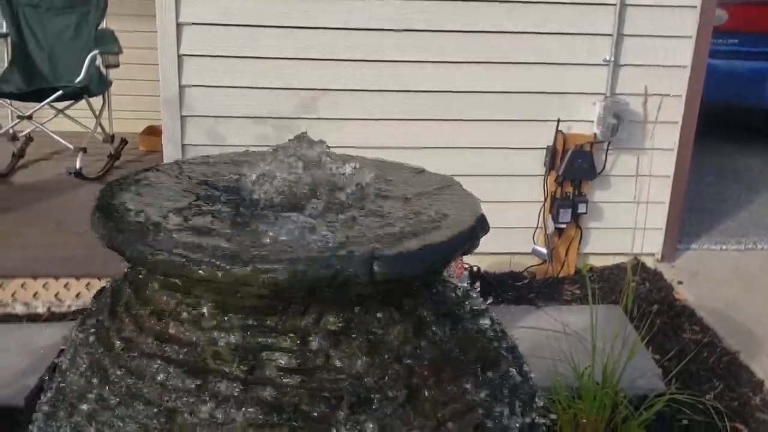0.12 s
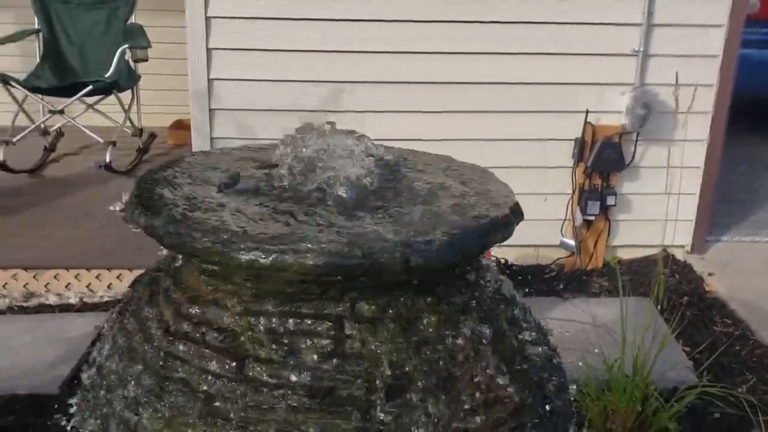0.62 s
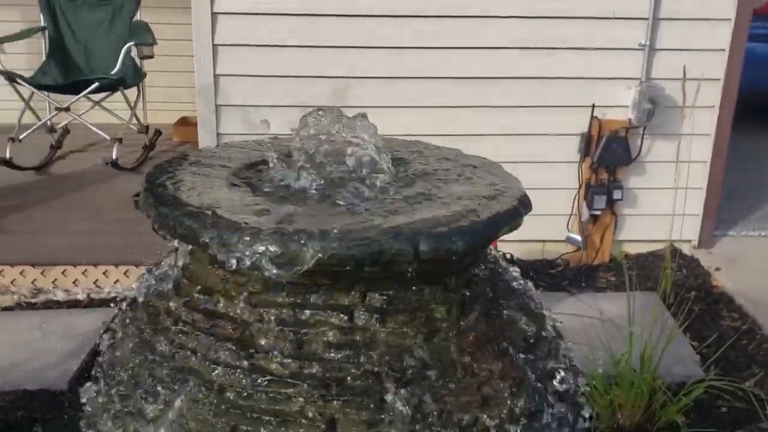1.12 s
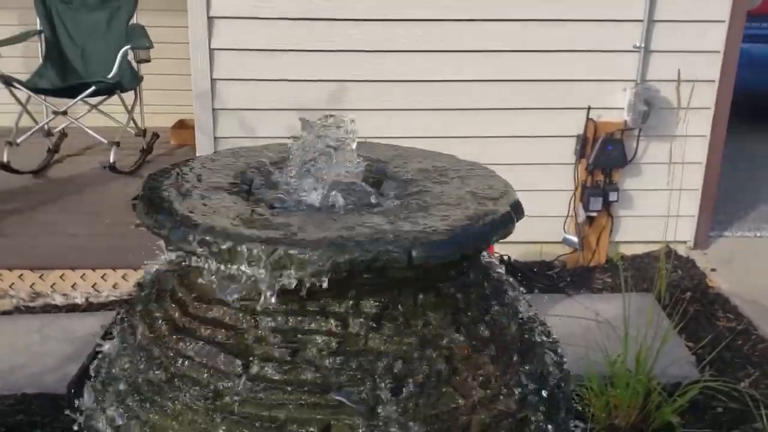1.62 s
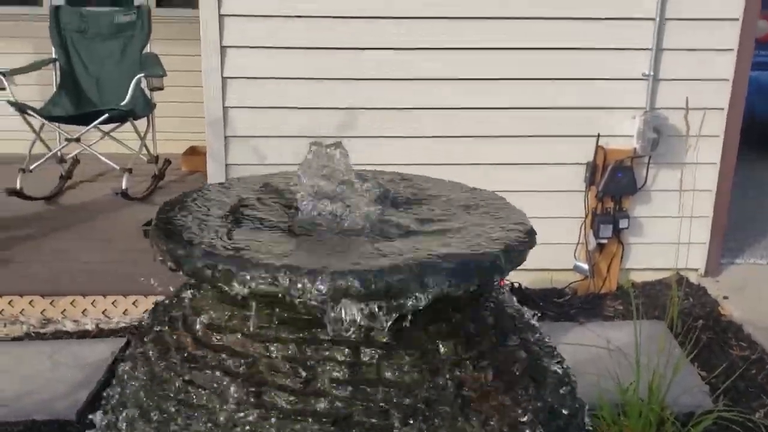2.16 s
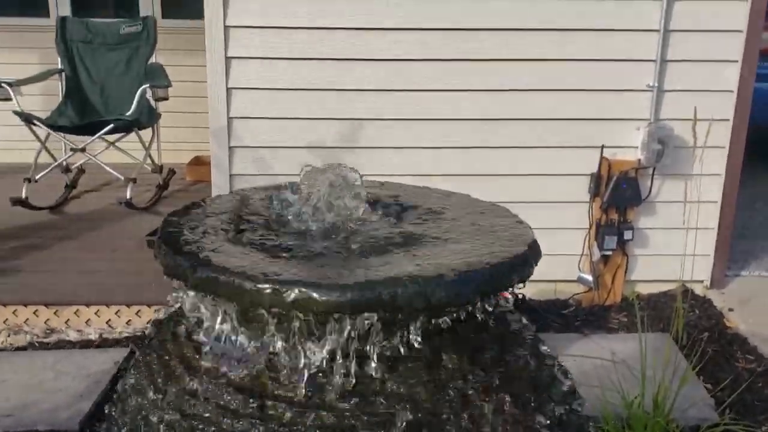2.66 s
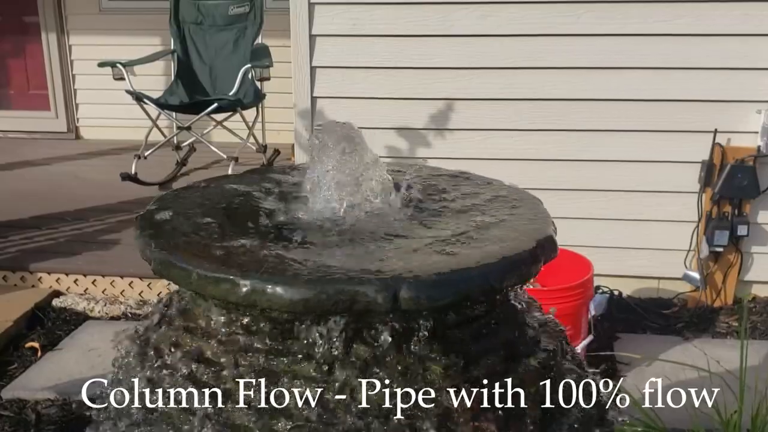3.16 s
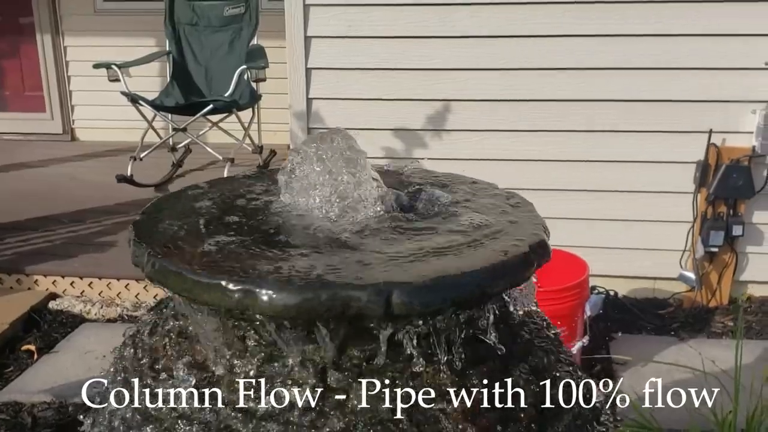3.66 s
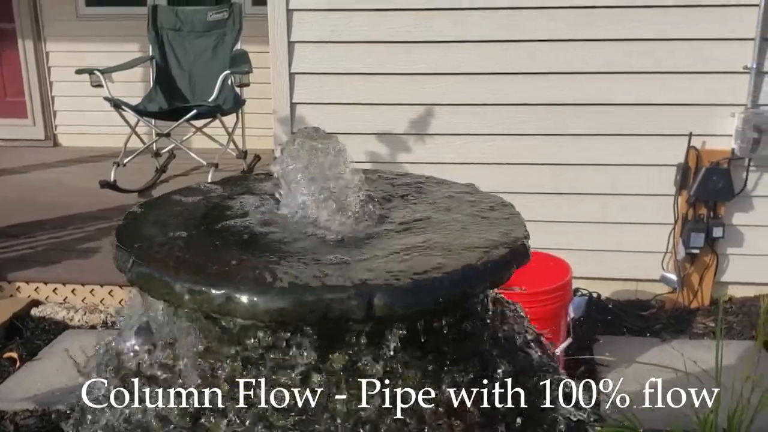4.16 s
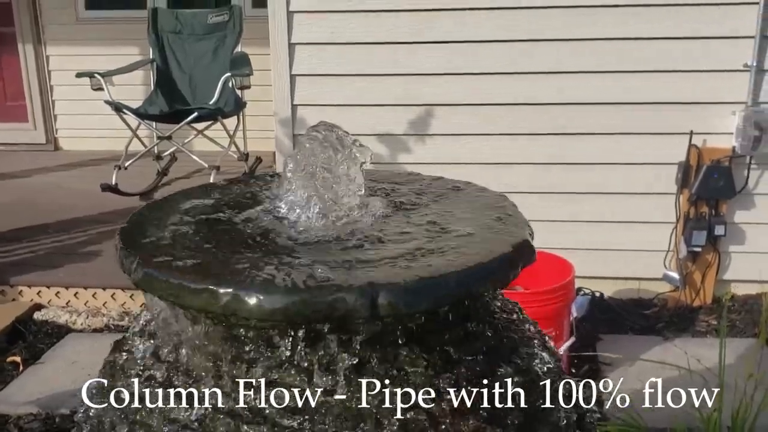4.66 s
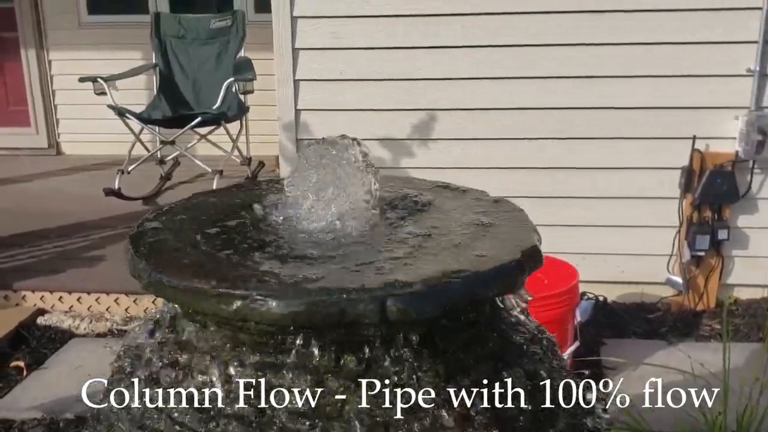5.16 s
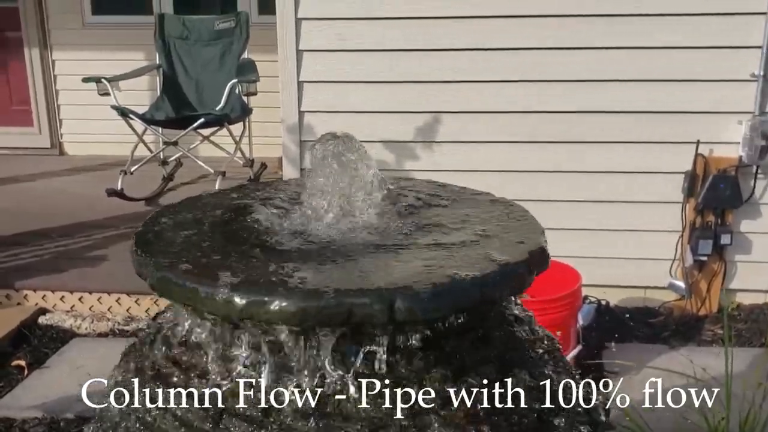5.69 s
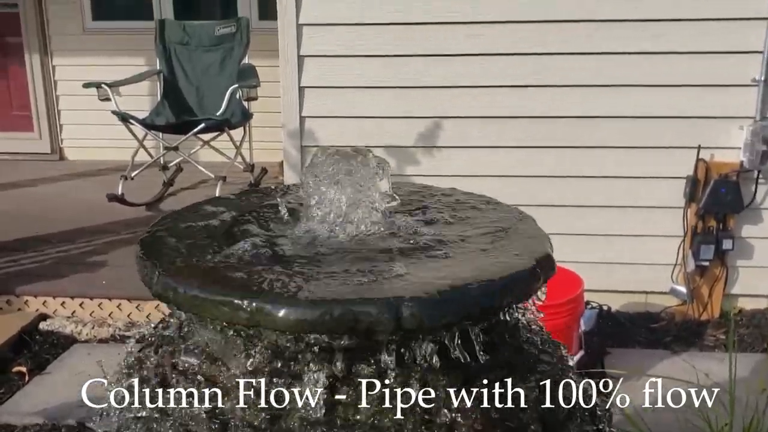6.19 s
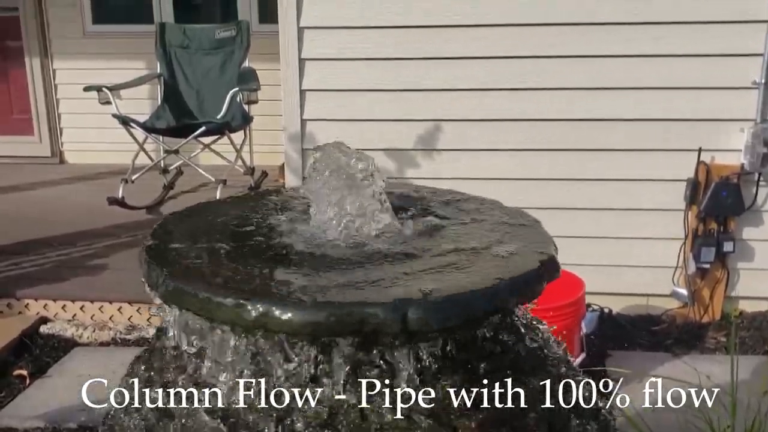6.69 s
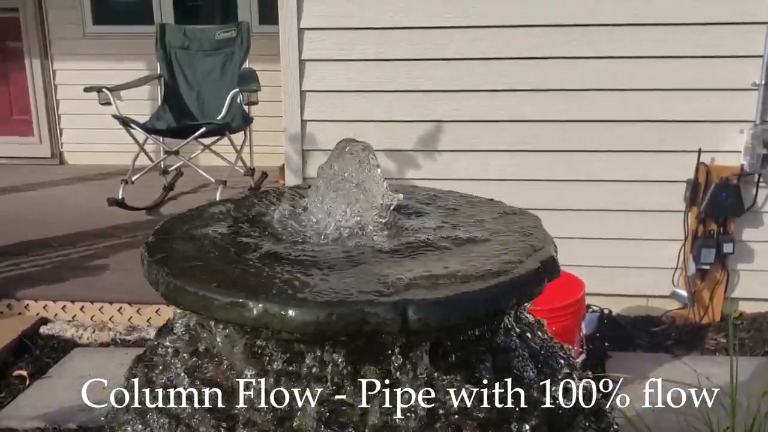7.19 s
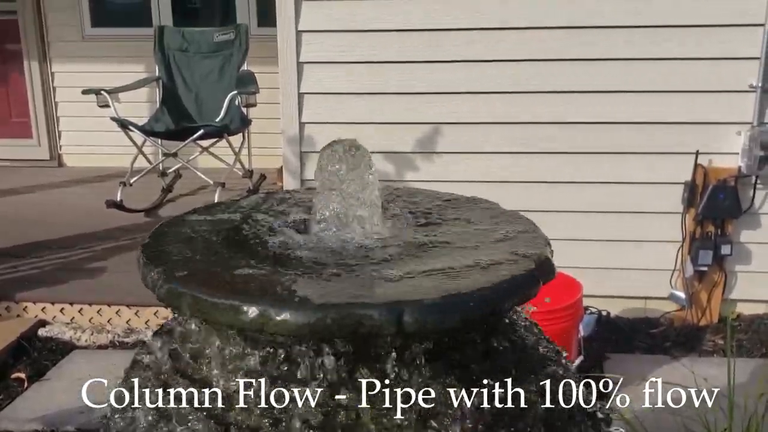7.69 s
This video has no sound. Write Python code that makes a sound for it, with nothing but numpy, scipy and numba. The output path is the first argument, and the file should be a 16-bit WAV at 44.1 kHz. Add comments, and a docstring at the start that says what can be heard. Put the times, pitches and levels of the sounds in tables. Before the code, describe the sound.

A stone urn fountain outdoors, close to a stereo microphone. From 0 seconds water is already running: a bright, dense splash with fine hissing spray, small clear bubbles plinking, rounder gurgles at the pipe mouth and drops slapping wet stone. A faint pump hum, low rumble and occasional dull knocks lie beneath. Water spills over the rim in brief surges about every half second, noticeably near 0.4, 0.8, 1.3, 1.8 and 2.7. At 2.77 everything stops abruptly, leaving about a tenth of a second of silence. At 2.87 the water returns from another angle, its tone changed at each ear, quieter and more even, with gentler surges and fewer prominent plinks. Around 4.6 to 5 seconds it swells; gurgles, plinks and splashes become livelier, and the flow stays fuller until it ends around 7.8 seconds, without fading.

```python
"""An urn fountain close by, outdoors: a low rumble and a pump hum lie under water that gurgles and splashes down.
From the start, noise makes the splash and fine spray, short noise bursts the drops, gliding tones the bubbles.
At 2.77 s the sound cuts out for about a tenth of a second.
It comes back from another angle, with a new tone colour at each ear, quieter at first;
near 5 s it swells and stays fuller until the end."""
import sys
import numpy as np
from scipy import signal
from scipy.fft import rfft, irfft
from scipy.io import wavfile
from scipy.ndimage import uniform_filter1d
from numba import njit

SR = 44100
rng = np.random.default_rng(int(sys.argv[2]) if len(sys.argv) > 2 else 0)


def persist_wave(psi):
    """Save psi, clipped to +-1, as 16-bit WAV."""
    counts = np.round(np.clip(psi, -1, 1) * 32767).astype(np.int16)
    wavfile.write(sys.argv[1], SR, np.atleast_2d(counts).T)


def field_ratio(decibels):
    """Amplitude ratio for a level in dB (20 dB per decade); scalars and array-likes work."""
    return 10 ** (np.asarray(decibels, dtype=float) / 20)


N = 344862
T = np.arange(N) / SR  # time of every sample [s]

# the two stretches of sound, with silence between: (start [s], end [s])
STRETCHES = [(0, 2.7745), (2.8685, 7.82)]
# low and high tones of the rumble: (frequency [Hz], relative level [dB])
RUMBLE_COLOUR = [(20, -34), (35, -13), (45, 5.5), (63, 3.5), (90, 3.5), (130, -8), (157, 2.5), (190, -23.5),
                 (232, -9.5), (300, -26.5)]
# pump tones: (frequency [Hz], relative level [dB], size of the waver [dB])
HUM_TONES = [(103.9, 3, .5), (120.6, -8, 4), (98, -14, 1)]
# base levels for the whole of each stretch, to which the swell is added, one row per stretch:
# (splash [dB], fine spray [dB], hum [dB], rumble [dB])
BASE_LEVELS = [(-39, -35.5, -50, -56.5), (-38, -31.5, -57, -59.5)]
# shared sag and swell of the steady layers and random events, one list per stretch: (time [s], level change [dB])
SWELL = [
    [(0, -1), (.6, 1.3), (1.8, 0.5), (2.3, 0), (2.77, -2)],
    [(2.87, -5), (3.6, -4.5), (4.1, -5.5), (4.6, -5), (5.0, -1), (5.6, .5), (6.5, 1), (6.85, 0.5),
     (7.82, 0.55)],
]
# waves spilling over the rim: (time of the splash peak [s], splash change [dB], spray change [dB])
WAVES = [(.36, 3.5, 5), (.83, 3, 4.5), (1.29, 3.5, 4.5), (1.48, 1, 2), (1.79, 3, 5.5), (2.21, 1, 1.5),
         (2.71, 3, 1.5), (3.24, -1.5, 3), (4.21, 1.5, 1), (4.76, 1.5, 1), (4.97, 1, 2), (5.53, 1.5, 0.5),
         (5.72, 1.5, 1.5), (6.47, 0, -0.5), (7.28, 0.5, 0.5)]
# splash colour at each ear:
# (frequency [Hz], left, right in the first stretch [dB], left, right in the second stretch [dB])
SPLASH_COLOUR = [(204, -16.5, -15.5, -15.5, -17.5), (238, -17, -15.5, -17.5, -17.5),
                 (278, -18, -22.5, -21, -22.5), (456, -17, -15.0, -10, -9.5), (520, -11, -15, -8, -10.5),
                 (580, -14, -11.5, -15, -14.5), (1000, -9.5, -10, -12, -12), (1425, -11.5, -5, -11.5, -9),
                 (2170, -8.5, -2.1, -3.5, -5), (3640, -10, -0.1, -4.5, -1.4), (4330, -8.5, -8, -7, -6.5),
                 (6500, -8.5, -11.5, -8, -13.5), (9300, -2.5, -22.5, -4.5, -17.5)]
# fine spray colour at each ear:
# (frequency [Hz], left, right in the first stretch [dB], left, right in the second stretch [dB])
SPRAY_COLOUR = [(6200, -10.0, -14.0, -9.1, -14.4), (8800, -10.9, -16.1, -8.4, -23.1),
                (10500, -8.6, -11.6, -7.4, -17.9), (12200, -5.9, -6.1, -2.4, -11.4),
                (13800, -5.7, -10.7, -1.3, -9.4), (14800, -4.0, -13.7, 0.3, -8.0),
                (15600, -2.6, -13.7, 1.4, -8.5)]
# dull knocks in the urn: (time [s], level [dB], pitch [Hz])
KNOCKS = [(1.139, -48, 156), (1.318, -37.5, 160), (1.421, -45, 226), (1.97, -49, 158), (1.985, -44, 246),
          (2.515, -50, 150), (5.793, -51, 164), (7.279, -49, 160)]
# big bubbles at the pipe mouth: (time [s], level [dB], pitch [Hz])
GURGLES = [(0.095, -44.5, 514), (0.632, -44, 546), (1.429, -42, 504), (1.514, -41, 470), (1.654, -41, 610),
           (2.13, -41, 510), (2.311, -43.5, 454), (2.381, -39, 494), (2.538, -36, 635), (2.572, -39, 537),
           (2.679, -43, 685), (3.53, -44, 536), (3.914, -45.5, 513), (4.61, -47, 543), (4.93, -46, 524),
           (5.044, -47, 480), (5.185, -43.5, 460), (5.242, -42, 546), (5.294, -38.5, 518),
           (5.686, -44, 490), (5.952, -44, 510), (6.088, -43.5, 421), (6.835, -46, 540), (6.96, -41.5, 523),
           (7.017, -41, 520), (7.161, -45, 496), (7.187, -43, 520), (7.322, -42, 524), (7.625, -47, 530),
           (7.648, -38, 510), (7.696, -37, 523), (7.758, -41, 492)]
# small clear ringing bubbles: (time [s], level [dB], pitch [Hz])
PLINKS = [(0.0662, -28, 1700), (0.2947, -25, 2620), (0.3132, -17.5, 3340), (0.335, -30.5, 854),
          (0.375, -29, 1960), (0.377, -27.5, 1420), (0.4534, -18, 3460), (0.5082, -23, 2400),
          (0.6355, -26, 2490), (0.774, -33, 1350), (0.7941, -22, 3580), (0.9981, -30, 3460),
          (1.0635, -25.5, 3660), (1.0984, -23.5, 2280), (1.19, -37, 850), (1.2176, -22, 3630),
          (1.2665, -23, 1670), (1.4022, -23, 3550), (1.426, -34, 1260), (1.4696, -18.5, 3340),
          (1.5678, -30, 3720), (1.6182, -19.5, 3290), (1.727, -25, 2300), (1.7774, -22, 3630),
          (1.8188, -22, 3370), (1.9879, -23, 3500), (2.076, -32, 1100), (2.231, -30.5, 950),
          (2.566, -31, 1620), (2.6544, -27, 3660), (2.9472, -33, 2340), (3.3747, -28, 2090),
          (3.6466, -33.5, 1750), (3.8407, -33, 3070), (4.2, -40, 1110), (4.385, -34, 1900),
          (4.6877, -30, 3260), (5.0305, -28, 3370), (5.0968, -29, 2550), (5.2899, -22.5, 3660),
          (5.313, -34.5, 1190), (5.3906, -28, 2460), (5.549, -35, 1290), (5.6146, -24, 3270),
          (5.6456, -20, 4430), (5.698, -37, 855), (5.7104, -21.5, 3220), (5.7304, -19.5, 3740),
          (5.9693, -24, 3100), (6.3026, -25, 2420), (6.336, -24, 3630), (6.34, -27.5, 1170),
          (6.4318, -23, 2900), (6.8833, -25, 2000), (6.9835, -25, 2830), (7.147, -34, 1340),
          (7.196, -28, 2280), (7.2255, -20.5, 3370), (7.4919, -27, 3250), (7.6755, -21, 3320),
          (7.687, -33, 1250), (7.7712, -27, 2800)]
# drops slapping wet stone, before colouring: (time [s], level [dB], level of the duller part [dB])
SLAPS = [(0.1351, -12, -25), (0.306, -20, -24), (0.4374, -15, -22), (0.4544, -5, -30), (0.7916, -18, -14),
         (0.8355, -15, -24), (0.8704, -8, -27), (0.921, -8, -29), (1.098, -5, -10), (1.2052, -22, -29),
         (1.6407, -7, -15), (2.156, -23, -18), (2.2675, -7, -28), (2.2787, -7, -27), (2.3531, -9, -31),
         (2.5125, -7, -32), (2.6567, -10, -22), (2.6605, -15, -27), (2.677, -16, -24), (2.7312, -9.5, -30),
         (2.736, -15, -28), (2.8687, -11, -23), (3.1383, -15, -21), (3.1926, -18, -35), (3.3877, -14, -34),
         (4.187, -18, -25), (4.9302, -23, -30), (4.997, -23, -24), (5.032, -6, -14), (5.1282, -19, -30),
         (5.5373, -21, -28), (5.647, -9, -12), (5.7924, -11, -25), (6.034, -10, -24), (6.0836, -19, -17),
         (6.12, -10, -19), (6.339, -17, -24), (6.4652, -18, -22), (6.6094, -18, -25), (6.6578, -17, -20),
         (6.983, -12, -25), (7.28, -12, -23), (7.3467, -21, -23), (7.3926, -16, -30), (7.5577, -16, -29)]


def rms_one(x):
    """Scale a sound so that the average of its channels has rms 1."""
    return x / np.sqrt(np.mean(np.mean(np.atleast_2d(x), axis=0) ** 2))


def butter(x, hz, kind, order=2):
    """Keep the lows or the highs with a Butterworth filter."""
    return signal.sosfilt(signal.butter(order, hz, kind, fs=SR, output="sos"), x)


def colour(x, hz, db, size=8192):
    """Shape the tone through (Hz, dB) points with a minimum-phase filter, which never sounds early."""
    f = np.linspace(1, SR / 2, size + 1)
    cepstrum = irfft(np.log(field_ratio(np.interp(np.log(f), np.log(hz), db))))
    # folding the cepstrum onto its first half gives the minimum phase
    cepstrum[1:size] *= 2
    cepstrum[size + 1:] = 0
    response = irfft(np.exp(rfft(cepstrum)))
    return signal.fftconvolve(x, response)[:len(x)]


def walk(steps_per_s):
    """Smooth random wander: random steps, averaged twice, with spread 1."""
    k = int(SR / steps_per_s)
    steps = np.repeat(rng.standard_normal(N // k + 1), k)
    smooth = uniform_filter1d(uniform_filter1d(steps, k), k)[:N]
    return smooth / smooth.std()


def in_stretch(pair, s=T):
    """Pick the first or second value, whichever stretch each moment belongs to."""
    return np.where(s < STRETCHES[1][0], *pair)


def swell_db():
    """Shared slow rise and fall in dB, joined through both stretches."""
    s, db = np.concatenate(SWELL).T
    return np.interp(T, s, db)


def waves(db, lead_s):
    """Level change in dB as each wave comes and goes as a bell curve, over a slow random wander."""
    spread_s = 0.049
    total = 0.67 * walk(6.0)
    for peak_s, change_db in zip(np.transpose(WAVES)[0], db):
        total = total + change_db * np.exp(-((T + lead_s - peak_s) / spread_s) ** 2 / 2)
    return total


def sizes(chance, spread_db, most_db):
    """Most events small, a few large: dB exponentially distributed up to a largest size."""
    return field_ratio(np.minimum(-spread_db * np.log(1 - chance), most_db))


def more(table, count, db, spread_db, low, high, tilt_db=0):
    """Add random events that follow the swell and waves; last column low to high, low ones softer by the tilt."""
    s, e, p = rng.random((count, 3)).T
    s = s * T[-1]
    lift_db = swell_db() + waves(np.transpose(WAVES)[1], lead_s=0)
    extra_db = in_stretch(db, s) + spread_db * (2 * e - 1) - tilt_db * (1 - p) ** 2
    extra_db = extra_db + np.interp(s, T, lift_db)
    extra = np.transpose([s, extra_db, low + (high - low) * p])
    return np.concatenate([table, extra]).T


@njit
def ring(start, size, hz, cycles, glide, pan, lead, n, sr):
    """Ringing bubbles: a soft rise, an exponential fall over some cycles, pitch climbing as they near the surface."""
    out = np.zeros((2, n))
    for k in range(len(start)):
        first = int(start[k] * sr)
        tau = cycles[k] * sr / hz[k] / 3  # fall time in samples
        phase = 0.
        for j in range(min(int(7 * tau), n - first)):
            u = j / tau
            env = 2 * size[k] * np.exp(-u) * (1 - np.exp(-4 * u))
            phase += 2 * np.pi * min(hz[k] * (1 + glide[k] * u), .45 * sr) / sr
            out[0, first + j] += env * pan[k] * np.sin(phase + lead[k])
            out[1, first + j] += env / pan[k] * np.sin(phase - lead[k])
    return out


def bubbles(s, size, hz, pan_db, cycles, glide):
    """Bubbles to one side or the other: high ones reach the ears out of step; ring and climb vary."""
    side, climb, length = rng.random((len(s), 3)).T
    lead = np.sign(side - .5) * np.pi / 4 * np.minimum(hz / 2550.0, 1) ** 2.3  # phase [radians]
    cycles = np.clip(cycles * (0.53 + 0.88 * length), 1, 60)
    pan = field_ratio(pan_db / 2 + 0 * s)  # one value per bubble
    return ring(s, size, hz, cycles, glide * 2 * climb, pan, lead, N, float(SR))


def ear_noise(alike_hz):
    """Noise alike at both ears in the bass, a little late at the left, and unrelated in the treble."""
    common, left, right = rng.standard_normal((3, N))
    alike = np.array([np.roll(common, 3), common])
    return butter(alike, alike_hz, "low") + butter(np.array([left, right]), alike_hz, "high")


def bursts(s, size, decay_ms):
    """Outline of sudden sprays: each jumps up and dies away exponentially."""
    hits = np.bincount((s * SR).astype(int), size, N)
    return signal.lfilter([1], [1, -np.exp(-1000 / SR / decay_ms)], hits)


def patter(count, spread_db, decay_ms):
    """Many random drops whose powers decay and add into a spiky outline of rms 1."""
    s, e = rng.random((count, 2)).T
    power = bursts(s * T[-1], sizes(e, spread_db, 24.0) ** 2, decay_ms)
    return rms_one(np.sqrt(power + 1e-18))


def froth(count, low_hz, high_hz, spread_db, cycles):
    """Random bubbles of all sizes, with equal energy per hertz before colouring."""
    s, p, e = rng.random((count, 3)).T
    hz = low_hz * (high_hz / low_hz) ** p
    size = hz * sizes(e, spread_db, 14.7)
    return rms_one(bubbles(s * T[-1], size, hz, 0, cycles, glide=0.037))


def heard(x, table, stretch, kind):
    """Give each ear its colour in this stretch, then keep the splash range or the spray range."""
    hz, *ears = np.transpose(table)
    both = np.array([colour(x[c], hz, ears[2 * stretch + c]) for c in range(2)])
    return butter(both, 7500, kind, order=6)  # splash below this frequency [Hz], spray above


def rumble():
    """Low rumble: coloured noise, partly different at each ear, with one unsteady low note."""
    mid, side = (rms_one(colour(rng.standard_normal(N), *np.transpose(RUMBLE_COLOUR))) for _ in range(2))
    note = field_ratio(-2.5 + 2.2 * walk(5.7)) * np.sin(2 * np.pi * (48.8 * T + 0.19 * walk(2.7)))
    return note + mid + field_ratio(-8.5) * side * np.array([[1], [-1]])


def pump_hum():
    """Pump hum: close tones that beat against each other while each one's level wavers."""
    hum = np.zeros(N)
    for hz, db, waver_db in HUM_TONES:
        hum += field_ratio(db + waver_db * walk(3.0)) * np.sin(2 * np.pi * (hz * T + rng.random()))
    return rms_one(hum)


def drone():
    """Hum and rumble at their levels, a little stronger at the left ear."""
    hum_base, rumble_base = np.transpose(BASE_LEVELS)[2:]
    swell = swell_db()
    hum_db = swell + in_stretch(hum_base)
    rumble_db = swell + in_stretch(rumble_base) + 2.8 * walk(5.5)  # the rumble comes and goes
    both = field_ratio(hum_db) * pump_hum() + field_ratio(rumble_db) * rumble()
    return both * field_ratio(np.array([[.8], [-.8]]))


def knocks():
    """Dull knocks in the urn: low tones that die away with hardly any climb in pitch."""
    s, db, hz = more(KNOCKS, count=24, db=(-55., -58.), spread_db=3.5, low=140., high=280.)
    return bubbles(s, field_ratio(db), hz, 0, cycles=13.3, glide=.002)


def gurgles():
    """Big bubbles at the pipe mouth: low ringing tones that climb slightly."""
    s, db, hz = more(GURGLES, count=90, db=(-52., -48.), spread_db=2.5, low=417.0, high=618.0)
    return bubbles(s, field_ratio(db), hz, 0, cycles=15.4, glide=0.012)


def ringing_plinks(plinks):
    """Small clear bubbles: higher ones ring for slightly more cycles and lean further to the right."""
    s, db, hz = plinks
    pan_db = in_stretch((-7, -1.8), s) * np.minimum(hz / 2600., 1)  # left minus right
    return bubbles(s, field_ratio(db), hz, pan_db, cycles=12.4 * (hz / 1000) ** 0.062, glide=0.0065)


def plink_cracks(plinks):
    """The impact that traps each small bubble: a short burst of noise."""
    s, db, _ = plinks
    return field_ratio(1.5) * bursts(s, field_ratio(db), decay_ms=2.9) * ear_noise(1900.)


def stone_slaps():
    """Drops slapping wet stone: a sharp noise burst and a longer one to be made duller."""
    s, db, dull_db = more(SLAPS, count=65, db=(-22.5, -22.5), spread_db=5.0, low=-36.0, high=-23.0)
    slaps = bursts(s, field_ratio(db), decay_ms=1.1) * ear_noise(1900.)
    thuds = bursts(s, field_ratio(dull_db), decay_ms=2.2) * ear_noise(1900.)
    return slaps, thuds


def fine_spray(drops):
    """Fine spray: steady noise, the shared drops and tiny drops that only tick in the treble."""
    mist = patter(count=3000, spread_db=2.5, decay_ms=0.7)
    return (field_ratio(-7.5) + field_ratio(-8.5) * drops + field_ratio(-7.5) * mist) * ear_noise(1900.)


def splashing(drops):
    """Splash: a sheet of noise with drops on stone, bubbling froth and the low bubbling pipe mouth."""
    crackle = patter(count=2500, spread_db=1.5, decay_ms=0.85)  # hard little drops on stone
    splash = (field_ratio(-4.0) + field_ratio(-4.5) * drops + field_ratio(-10.0) * crackle) * ear_noise(1830.0)
    splash += field_ratio(-9.5) * froth(count=7000, low_hz=601.4, high_hz=7040.0, spread_db=3.5, cycles=16.0)
    splash += field_ratio(-7.0) * froth(count=9000, low_hz=871.0, high_hz=7100.0, spread_db=2.0, cycles=4.25)
    splash += field_ratio(-20.5) * froth(count=420, low_hz=347.5, high_hz=672.0, spread_db=5.0, cycles=20.0)
    return splash


def water(plinks):
    """Running water: splash below and spray above, each with its own level, plus single impacts."""
    _, splash_change, spray_change = np.transpose(WAVES)
    splash_base, spray_base = np.transpose(BASE_LEVELS)[:2]
    swell = swell_db()
    splash_db = swell + in_stretch(splash_base) + waves(splash_change, lead_s=0)
    spray_db = swell + in_stretch(spray_base) + waves(spray_change, lead_s=0.043)  # spray comes first
    surge = field_ratio(0.25 * walk(18.0) + 0.66 * walk(45.))  # quick unsteadiness
    drops = patter(count=6000, spread_db=3.5, decay_ms=2.9)
    splash = surge * splashing(drops)
    spray = surge * fine_spray(drops)
    slaps, thuds = stone_slaps()
    dull_hits = plink_cracks(plinks) + thuds
    out = np.zeros((2, N))
    for k, (start_s, end_s) in enumerate(STRETCHES):
        part = slice(int(start_s * SR), int(end_s * SR))
        low = rms_one(heard(splash[:, part], SPLASH_COLOUR, k, "low"))
        high = rms_one(heard(spray[:, part], SPRAY_COLOUR, k, "high"))
        steady = field_ratio(splash_db[part]) * low + field_ratio(spray_db[part]) * high
        dull = heard(dull_hits[:, part], SPLASH_COLOUR, k, "low")
        sharp = heard(slaps[:, part], SPRAY_COLOUR, k, "high")
        out[:, part] = steady + dull + sharp
    return out


def scene():
    """The whole fountain: drone, knocks, gurgles, ringing bubbles and running water."""
    plinks = more(PLINKS, count=90, db=(-29., -30.), spread_db=5.0, low=920.0, high=3650.0, tilt_db=11.5)
    return drone() + knocks() + gurgles() + ringing_plinks(plinks) + water(plinks)


def roll_off(x):
    """The treble ends steeply here."""
    return signal.sosfilt(signal.butter(12, 17100, fs=SR, output="sos"), x)


def record(dry):
    """The microphone drops the deepest bass; silence between the stretches; the very top is cut off."""
    on = sum((T >= start_s) & (T <= end_s) for start_s, end_s in STRETCHES)
    gated = butter(dry, 32.0, "high", order=3) * on
    top_cut = signal.ellip(12, .2, 70, 15750, fs=SR, output="sos")  # steep, from 15750 Hz up
    mix = signal.sosfilt(top_cut, gated)
    return roll_off(mix)


dry = scene()
out = record(dry)
persist_wave(out)
```